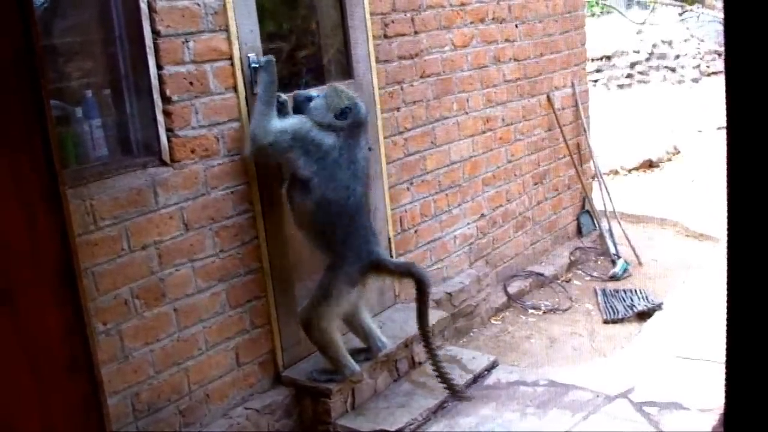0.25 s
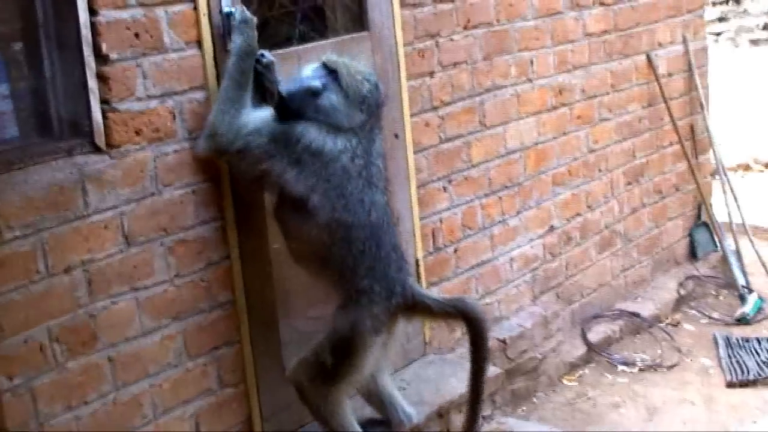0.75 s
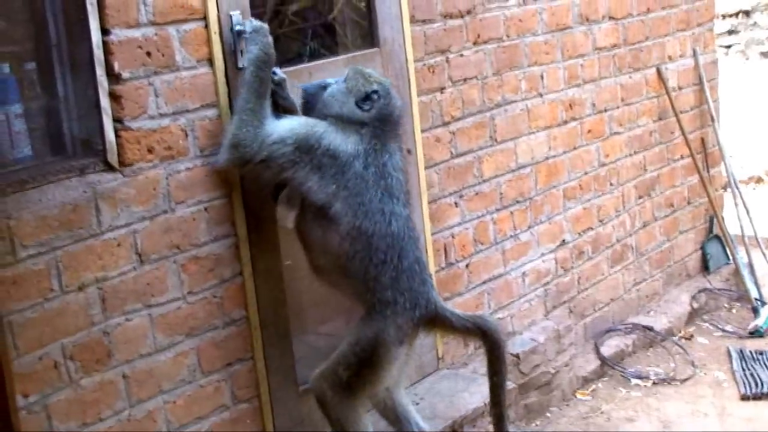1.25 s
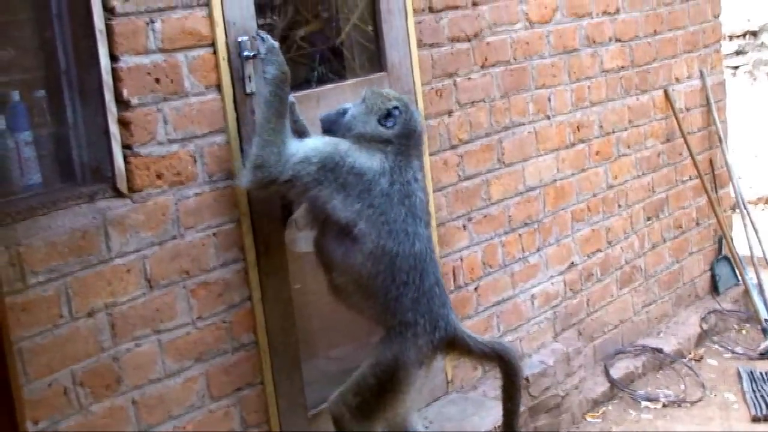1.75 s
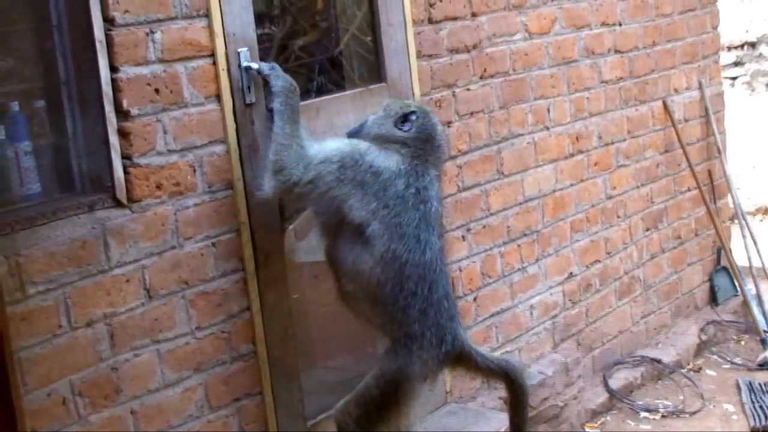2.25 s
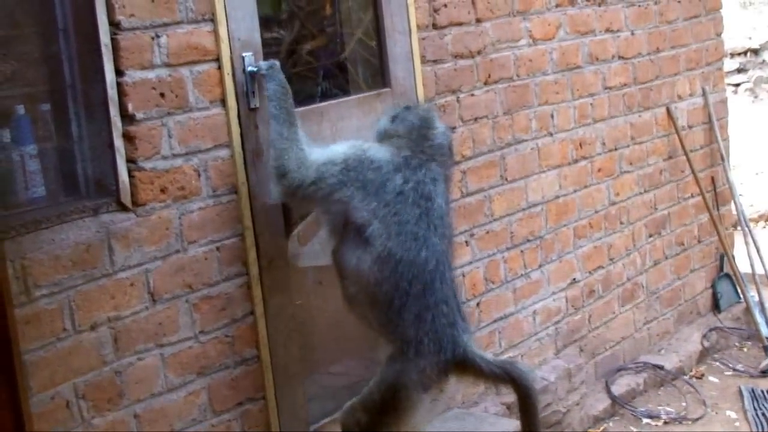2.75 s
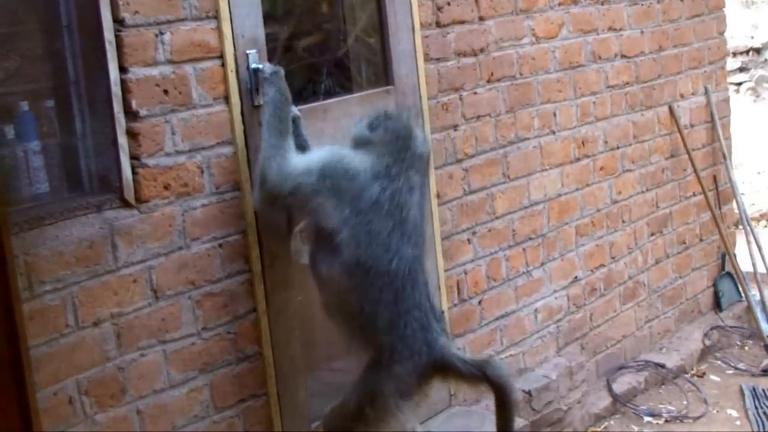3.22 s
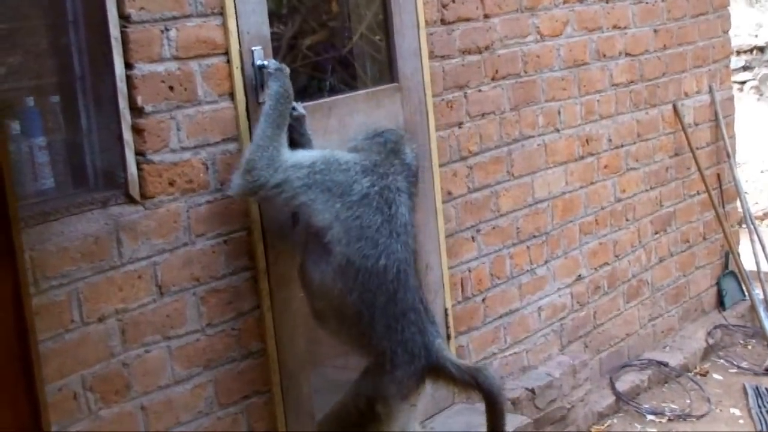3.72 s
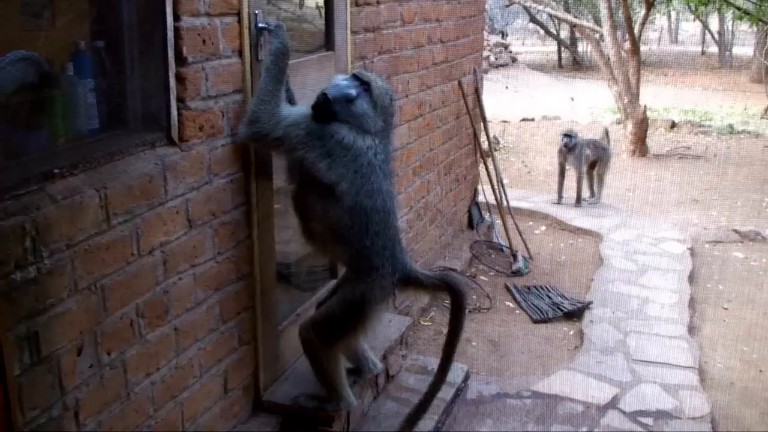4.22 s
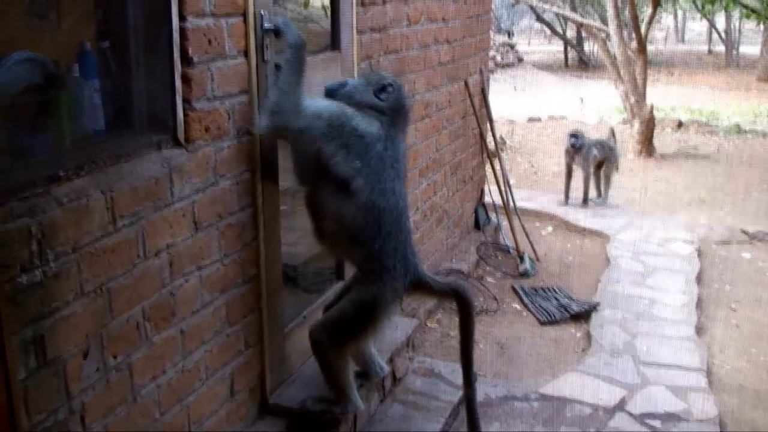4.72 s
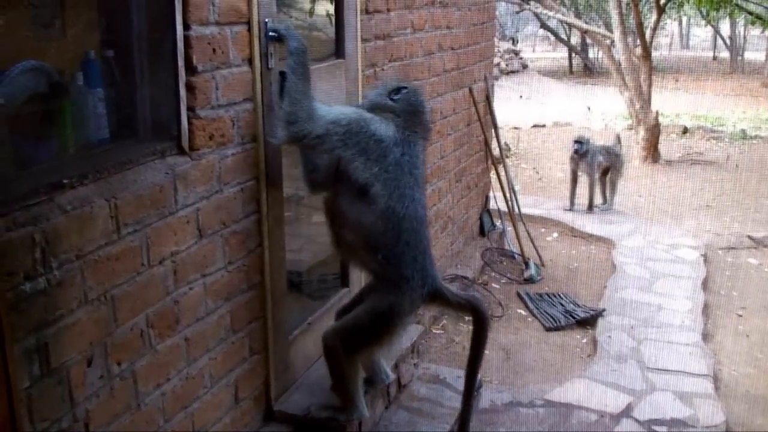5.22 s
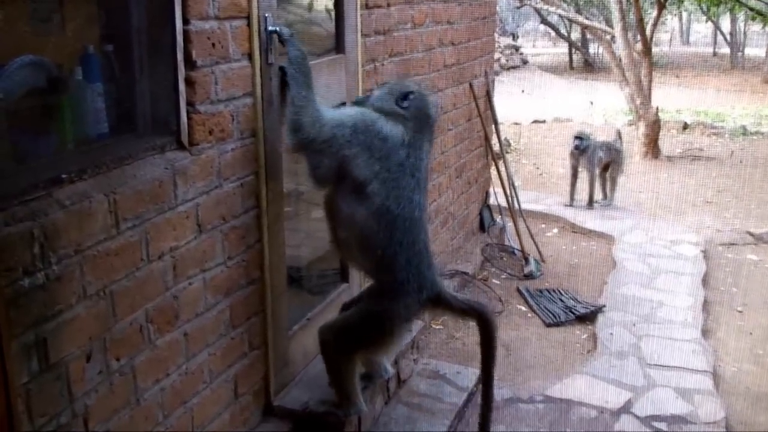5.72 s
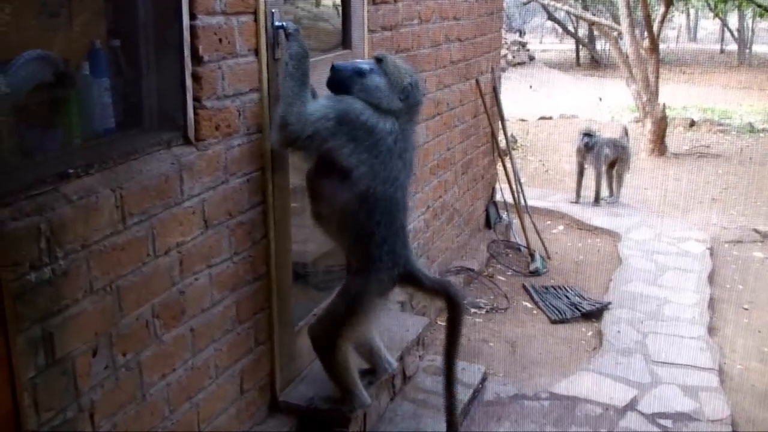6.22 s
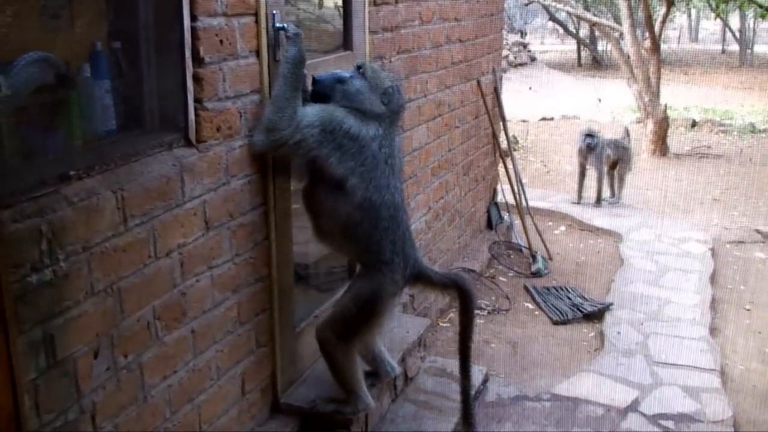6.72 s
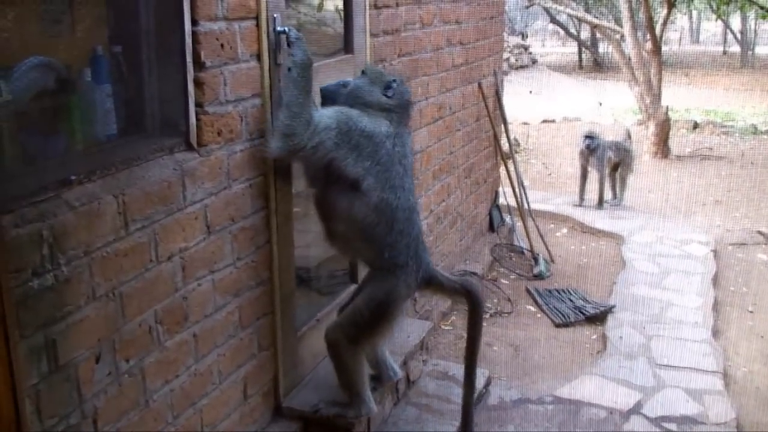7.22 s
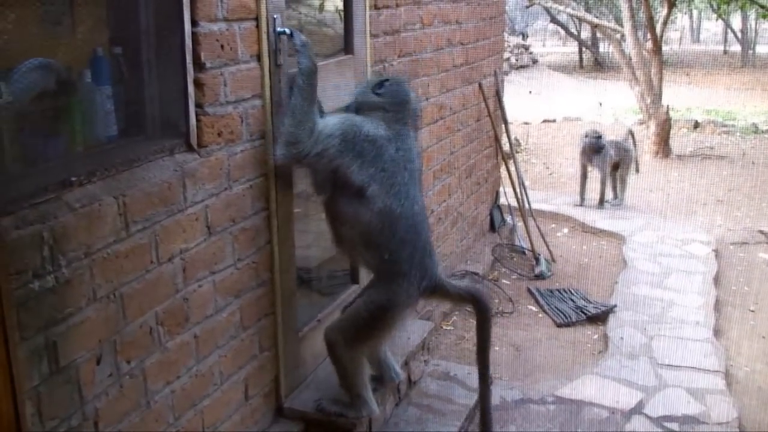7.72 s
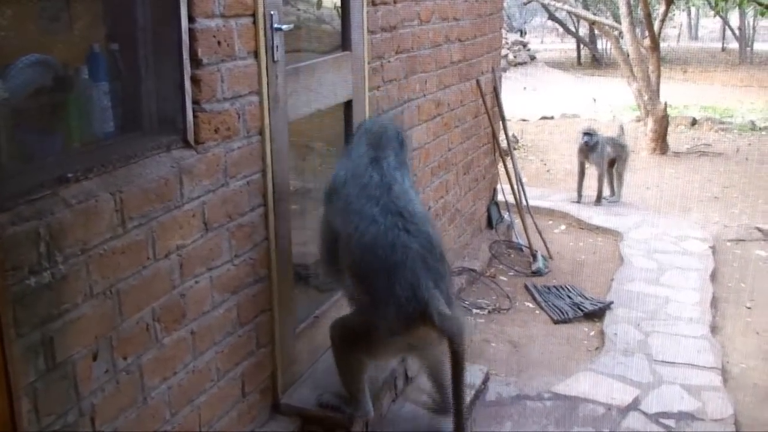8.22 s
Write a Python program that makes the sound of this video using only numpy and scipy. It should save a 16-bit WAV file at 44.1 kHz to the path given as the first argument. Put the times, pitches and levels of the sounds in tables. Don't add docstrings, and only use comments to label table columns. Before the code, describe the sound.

Close to a brick house, a metal handle and latch clack violently for about half a second, then fall quiet apart from faint squeaks and birds. A light jiggle leads into a second hard rattle. After a tiny cut to silence, the perspective changes: soft woody knocks, then a third fierce yank, lull and a final door knock. Short wall reflections, slight hiss.

```python
import sys
import numpy as np
from scipy import signal
from scipy.fft import rfft, irfft, next_fast_len
from scipy.io import wavfile
from scipy.ndimage import uniform_filter1d

SR = 44100
rng = np.random.default_rng(int(sys.argv[2]) if len(sys.argv) > 2 else 0)


def materialize(psi):
    bounded = np.clip(np.atleast_2d(psi).T, -1, 1)
    quanta = np.round(bounded * 32767).astype(np.int16)
    wavfile.write(sys.argv[1], SR, quanta)


def to_linear_factor(level_db):
    exponent = np.asarray(level_db, float) / 20
    return 10 ** exponent


N = 373086
T = np.arange(N) / SR
GAP_START_S, GAP_END_S = 4.174, 4.196
FIRST = T < GAP_START_S
BLOW = 8192

# (time [s], peak level [dB], low thud [dB], bright tick [dB])
FIRST_YANK = [(-0.008, -8.5, -8.5, -17), (0.0515, -12.5, -30, -17), (0.0965, -6, -14, -16),
              (0.1648, -6.5, -39, -18), (0.2396, -9, -17, -22), (0.274, -10.5, -19, -15),
              (0.2897, -11.5, -12, -14), (0.3576, -7.5, -23, -18.5), (0.3842, -12, -18, -29),
              (0.4127, -7.5, -18, -18), (0.4724, -10, -23, -19.5), (0.515, -16.5, -15, -14),
              (0.5543, -20, -13, -16), (0.5776, -29, -15, -26), (0.6569, -33, -7, -31),
              (1.2588, -25.5, -21, -9), (1.2643, -27.5, -17, -12), (1.3431, -20.5, -15.5, -11.5)]
JIGGLE = [(2.0695, -39.5, -4, -25), (2.1077, -36, -12, -4), (2.133, -31.5, -16, -33),
          (2.149, -25, -13, -13), (2.288, -28, -12.5, -11), (2.3793, -25, -14.5, -22),
          (2.438, -20, -13.5, -17), (2.47, -19.5, -13.5, -10), (2.528, -11.5, -19.5, -11.5),
          (2.574, -17, -14.5, -27), (2.599, -25, -4, -17), (2.6255, -19, -16, -17), (2.634, -11, -14, -16),
          (2.767, -34, -6, -30), (2.8066, -27.5, -25, -65)]
SECOND_YANK = [(2.83, -17.5, -16, -21), (2.871, -12, -15.5, -28), (2.9144, -7.5, -34, -13.5),
               (2.9418, -7, -16.5, -15), (3.0071, -6.5, -27, -16.5), (3.082, -10, -17, -18),
               (3.1016, -13, -16, -58), (3.1648, -9.5, -14, -18.5), (3.207, -20, -6.5, -17),
               (3.2327, -10, -17.5, -20.5), (3.2679, -7.5, -21, -15), (3.3141, -6.5, -22.5, -19),
               (3.3764, -7.5, -20, -20.5), (3.4184, -18.5, -19, -47), (3.4562, -11.5, -17, -26),
               (3.5355, -28.5, -3.5, -56), (3.5496, -20.5, -17, -51), (3.6971, -38, -6, -37),
               (3.715, -34, -6, -46), (3.845, -46, -12, -48)]
THIRD_YANK = [(5.679, -17, -14, -47), (5.698, -24, -24, 0), (5.7124, -10, -20, -3.5), (5.736, -13, -17, -9),
              (5.748, -6.5, -16, -20), (5.8133, -7, -32, -14.5), (5.8438, -14, -22, -11),
              (5.8708, -17.5, -10, -13), (5.89, -8.5, -25.5, -20), (5.956, -10.5, -19, 1.5),
              (5.9688, -8, -15.5, -12), (6.044, -10, -22, -8), (6.0495, -7, -18.5, -21),
              (6.0658, -10.5, -15.5, -38), (6.076, -10.5, -19, -20), (6.1441, -6.5, -37, -18),
              (6.17, -10.5, -15, -20), (6.2231, -13.5, -11, -22), (6.36, -24, -15, -13),
              (6.299, -15, -15.5, -19), (6.3876, -16.5, -27, -12.5), (6.4479, -27, -10, -22),
              (6.5194, -34, -14, -36), (6.5316, -32, -15, -38)]
KNOCKS = [(4.196, -34.5, -0.5, -27), (4.2166, -23.5, -12.5, -36), (1.358, -28.5, -12, -30),
          (1.378, -33.5, -10, -35), (1.398, -37, -11, -35), (4.5956, -30.5, -13.5, -19),
          (4.661, -28.5, -19.5, -18), (4.7793, -32, -13, -16), (4.8056, -22, -12, -23),
          (4.8455, -29, -9, -18), (5.1402, -45, -12, -16), (5.1548, -25.5, -15, -17),
          (5.201, -26, -14.5, -22), (5.2656, -33, -4.5, -15), (5.311, -28, -18, -21),
          (5.323, -21, -13, -12.5), (5.6172, -25.5, -10.5, -21), (5.6422, -31.5, -12.5, -30),
          (7.8024, -30, -12, -17), (7.8292, -18, -18, -8), (7.8604, -12.5, -16, -15),
          (7.8724, -14.5, -17, -8), (7.8802, -18.5, -15, -5)]
NEAR_BLOWS = FIRST_YANK + JIGGLE + SECOND_YANK


def level(x, db):
    return x * to_linear_factor(db) / np.sqrt(np.mean(x ** 2))


def curve(table, hz):
    points = np.array(table)
    return np.interp(np.log(hz + 1), np.log(points[:, 0]), points[:, 1])


def tint(x, table):
    size = next_fast_len(N)
    hz = np.arange(size // 2 + 1) * SR / size
    return irfft(rfft(x, size) * to_linear_factor(curve(table, hz)), size)[..., :N]


def walk(rate):
    k = int(SR / rate)
    steps = np.repeat(rng.standard_normal(N // k + 1), k)
    return 1.3 * uniform_filter1d(uniform_filter1d(steps, k), k)[:N]


def grit(shape, spread_db):
    return rng.standard_normal(shape) * to_linear_factor(spread_db * rng.exponential(size=shape))


def causal(db):
    cep = irfft(db * np.log(10) / 20)
    half = cep.shape[-1] // 2
    fold = np.r_[1, 2 * np.ones(half - 1)]
    return np.exp(rfft(cep[..., :half] * fold, 2 * half))


def rings(modes, hz, gains, detune=0.99):
    mode_hz, width_hz, db = np.transpose(modes)[:, :, None]
    resonance = 1 / (1 + 2j * (hz - mode_hz * detune) / width_hz)
    return np.sum(gains[..., None] * to_linear_factor(db) * resonance, axis=-2)


def puffs(events, length_s):
    return sum(to_linear_factor(db) * np.exp(-((T - s) / length_s) ** 2) for s, db in events)


def air(table, db):
    noise = tint(rng.standard_normal((2, N)), table) * to_linear_factor(walk(1.13))
    low = signal.sosfilt(signal.butter(2, 1100, fs=SR, output="sos"), noise)
    return level(noise + low * (to_linear_factor(2.4 * walk(4)) - 1), db)


def still_air():
    # (frequency [Hz], level [dB per Hz])
    near_air = [(35, -37), (60, -8.5), (330, -18), (553, -7), (593, -8.5), (1310, -14.5), (1860, -15.5),
                (4120, -13), (5500, -18), (6370, -27), (7910, -20.5), (9290, -30), (15000, -39),
                (15150, -90)]
    side_air = [(35, -24), (60, -15), (176, -6.5), (363, -11), (437, -6.5), (842, -3.5), (1010, -9),
                (2410, -15.5), (3700, -25.5), (5800, -15), (7760, -19), (15000, -34), (15150, -90)]
    return np.where(FIRST, air(near_air, -55.5), air(side_air, -55))


def hum():
    # (frequency [Hz], level [dB])
    hums = [(600, -68.5), (1800, -78)]
    return FIRST * sum(to_linear_factor(db + 2 * walk(2.6)) * np.sin(2 * np.pi * hz * T) for hz, db in hums)


def whine():
    # (multiple of the base tone [1], level [dB])
    partials = [(13, -78), (14, -75), (15, -78), (16, -77), (17, -77), (19, -80), (22, -82), (24, -84),
                (33, -86), (34, -85), (36, -86), (38, -86), (46, -96)]
    base_hz = 299.7
    return sum(to_linear_factor(db) * np.sin(2 * np.pi * k * base_hz * T + k * k) for k, db in partials)


def whistles():
    # (time [s], length [s], start [Hz], end [Hz], level [dB])
    peeps = [(.86, .03, 4200, 4100, -59), (.86, .04, 3100, 3100, -60), (1.04, .09, 3300, 2550, -62),
             (1.188, .055, 3720, 3500, -42), (1.25, .12, 3580, 3600, -60), (1.305, .06, 780, 830, -46),
             (1.54, .05, 1850, 2000, -59), (1.54, .05, 2300, 2600, -62), (2.275, .1, 1600, 1600, -50),
             (2.76, .04, 3800, 3300, -54), (4.02, .04, 3000, 3100, -60), (5.083, .015, 2900, 3000, -57),
             (6.59, .03, 3500, 2600, -52), (6.8, .2, 2800, 2800, -64), (6.65, .03, 2900, 2500, -60),
             (7.3, .25, 870, 850, -60), (7.19, .03, 1600, 1560, -60), (7.82, .03, 1700, 1700, -40)]
    # (delay [s], length [s], start [Hz], middle [Hz], end [Hz])
    bird_voices = [
        (0, .11, 3800, 2900, 2550),
        (.015, .125, 3700, 5400, 3700),
    ]
    # (time [s], level [dB])
    bird_calls = [
        (1.83, -58),
        (3.61, -59),
        (4.03, -63),
    ]
    tones = [(s, length, a, (a + b) / 2, b, db) for s, length, a, b, db in peeps]
    for s, db in bird_calls:
        tones += [(s + delay, *voice, db) for delay, *voice in bird_voices]
    out = np.zeros(N)
    rough = np.clip(.9 + .6 * walk(160), .4, 3)
    waver = walk(500)
    for s, length, *pitches, db in tones:
        u = np.arange(int(length * SR)) / (length * SR)
        span = slice(int(s * SR), int(s * SR) + len(u))
        glide_hz = np.polyval(np.polyfit([0, .5, 1], pitches, 2), u)
        phase = 2 * np.pi * np.cumsum(glide_hz * (1 + to_linear_factor(-db - 88) * waver[span])) / SR
        tone = np.sin(phase) + to_linear_factor(db + 26) * np.sin(2 * phase)
        out[span] += to_linear_factor(db + 3.5) * np.sin(np.pi * u) ** .5 * tone
    return out * rough


def scuffs():
    # (time [s], length [s], level [dB])
    brushes = [
        (8.158, .02, -44),
        (8.12, .02, -53),
        (8.42, .03, -57),
        (5.635, .02, -44),
    ]
    colour = [(800, -20), (3000, -5), (8000, 0), (15000, -10), (16000, -14), (16300, -45)]
    hiss = level(tint(grit(N, 2.0), colour), 0)
    return hiss * sum(puffs([(s, db)], length) for s, length, db in brushes)


def bump():
    after = np.clip(T - 4.068, 0, 1)
    crackle = tint(rng.standard_normal(N), [(100, 3), (1200, 4), (2000, -22), (5000, -42)])
    pulse = level(crackle, -7.5) - np.sin(2 * np.pi * 240 * after)
    return to_linear_factor(-26) * pulse * np.exp(-after / .004) * (after > 0)


def swing():
    # (start [s], length [s], level [dB])
    swings = [
        (0, 0.59, -39),
        (2.537, 0.16, -41.5),
        (2.9, 0.66, -36.5),
        (4.17, 0.13, -50),
        (4.6, 0.084, -56),
        (4.785, 0.11, -50),
        (5.15, .1, -56.5),
        (7.826, .1, -48.5),
        (5.307, 0.063, -49),
        (5.689, 0.81, -33),
    ]
    rise_s, sag_db_s, release_db_s = 0.038, 11, 116
    gain = 0
    for s, length, db in swings:
        fall_db = sag_db_s * (T - s) + release_db_s * np.clip(T - s - length, 0, 9)
        rise = np.clip((T - s) / rise_s + (s == 0), 0, 1)
        gain = gain + rise * to_linear_factor(db - np.maximum(fall_db, 0))
    return gain


def heave():
    colour = [(12, -54), (29, 0.0), (40, -0.5), (55, -9), (80, -16), (140, -59.0)]
    return level(tint(rng.standard_normal(N), colour), 0)


def pump():
    # (time [s], level [dB])
    surges = [(.12, -41), (.38, -36), (.63, -41), (1.05, -50), (2.6, -43), (2.96, -36), (3.31, -42),
              (3.53, -41.5), (3.8, -48), (4.27, -49), (4.45, -53), (4.65, -56), (4.9, -58), (5.2, -58),
              (5.4, -57), (6.62, -47), (6.85, -53.5), (5.77, -34), (6.1, -36), (6.4, -39)]
    breeze = to_linear_factor(-63 + 2 * walk(1.27))
    return swing() * to_linear_factor(-9.5) + breeze + puffs(surges, 0.06)


def shaken(body, spread_db):
    response = np.roll(irfft(body), BLOW // 2) * np.hanning(BLOW)
    return level(signal.fftconvolve(grit(N, spread_db), response, "same"), 0)


def ringing(table, thud_share, rise_s, t60_s, slope, db, rest_db):
    s, peak_db, thud_db, _ = np.transpose(table)
    power = np.zeros(N)
    power[(np.maximum(s, 0) * SR).astype(int)] = to_linear_factor(2 * (peak_db + thud_share * thud_db))
    power = signal.lfilter([1], [1, -to_linear_factor(-120 / t60_s / SR)], power)
    keep = np.exp(-1 / (rise_s * SR))
    power = signal.lfilter([1 - keep], [1, -keep], power)
    return np.sqrt(to_linear_factor(2 * db) * power ** slope + to_linear_factor(2 * rest_db))


def panel():
    # (frequency [Hz], width [Hz], level [dB])
    panel_modes = [(124, 22, 4), (185, 35, -3), (300, 50, -3), (405, 30, -2), (800, 110, -2)]
    hz = np.arange(BLOW // 2 + 1) * SR / BLOW
    body = .5 + rings(panel_modes, hz, np.ones(len(panel_modes)))
    body = body / (1 + (hz / 1000) ** 4) / (1 + (114 / (hz + 1)) ** 8)
    shudder = ringing(NEAR_BLOWS + THIRD_YANK + KNOCKS, thud_share=0.75, rise_s=0.0656, t60_s=.5,
                      slope=1.2, db=-16, rest_db=-66)
    return shaken(body, spread_db=2.5) * np.hypot(shudder, swing())


def ticks():
    # (time [s], peak level [dB])
    touches = [
        (0.0807, -24.5),
        (2.7447, -45),
        (2.9223, -26),
        (2.9472, -31),
        (3.1717, -34),
        (3.3333, -32),
        (5.7294, -18),
        (6.0425, -18.5),
        (6.0596, -21),
    ]
    colour = [(5000, -40), (8000, 1), (12000, -4), (15700, -9), (16200, -40)]
    hiss = level(tint(grit(N, 2.2), colour), -8.5)
    decay_s = 0.0056
    return hiss * sum(to_linear_factor(db) * np.exp(-np.clip(T - s, 0, 1) / decay_s) * (T > s) for s, db in touches)


def bounces(count, gap_s, contact_s):
    draw = rng.random((count, 2, 12))
    at = np.cumsum(gap_s * (.4 + 0.84 * draw[:, 0]), axis=1) - gap_s * (.4 + 1.2 * draw[:, 0, :1])
    place = np.clip(at * SR, 0, BLOW - 1).astype(int)
    touch = np.zeros((count, BLOW))
    np.put_along_axis(touch, place, .35 + .55 * draw[:, 1], axis=1)
    touch[:, 0] = 1
    return signal.lfilter([1], [1, -np.exp(-1 / (contact_s * SR))], touch)


def contacts(s, peak_db, rebounds):
    at, db = np.transpose(rebounds)
    late = at - s
    parent = np.argmin(np.where(late > 0, late, 9), axis=0)
    place = (late[parent, np.arange(len(at))] * SR).astype(int) % BLOW
    power = np.zeros((len(s), BLOW))
    power[:, 0] = 1
    power[parent, place] = to_linear_factor(2 * (db - 3 - peak_db[parent, 0]))
    power[:, 1:] = uniform_filter1d(power[:, 1:], size=40, axis=1)
    listed = np.isin(np.arange(len(s)), parent)[:, None]
    contact_s = .0038
    power = signal.lfilter([1], [1, -np.exp(-2 / (contact_s * SR))], power)
    return np.sqrt(np.abs(power)), listed


def blows(table, t60_s, modes, colour, lo_hz, tick_share, rebounds=None, rise_s=0.0012):
    s, peak_db, thud_db, tick_db = np.transpose(table)[:, :, None]
    t = np.arange(BLOW) / SR
    hz = np.arange(BLOW // 2 + 1) * SR / BLOW
    t60 = np.clip(t60_s * to_linear_factor(0.1 * (peak_db + 9) - 0.18 * (thud_db + 19.5)), .01, .3)
    touch = bounces(len(s), gap_s=.008, contact_s=.007) * to_linear_factor(-60 * t / t60)
    listed = False
    if rebounds:
        known, listed = contacts(s, peak_db, rebounds)
        touch = np.where(listed, known, touch)
    push = grit((len(s), BLOW), 1.5)
    push = touch * push / np.sqrt(uniform_filter1d(push ** 2, size=90, axis=1))
    push = push * (1 - np.exp(-t / rise_s))

    bright = 1 / (1 + (6800 / (hz + 1)) ** 8)
    tilt = (thud_db + 12.5) / (1 + (hz / 1300) ** 4) + (tick_db + 27.0) * bright
    chance = rng.standard_normal((len(s), 2, len(modes)))
    gains = (1 + .4 * chance[:, 0]) * to_linear_factor(.15 * np.minimum(peak_db + 8, 0))
    plain = causal(curve(colour, hz) + tilt)
    body = plain * (1 + rings(modes, hz, gains, 1 + 0.0066 * chance[:, 1, :, None]))
    treble_push = push * to_linear_factor(-60 * t / (tick_share * t60))
    hit = body * (rfft(push) * (1 - bright) + rfft(treble_push) * bright)

    clack = irfft(hit * (hz > lo_hz) * (hz < 7000))
    touch_energy = np.sum(touch ** 2, axis=1, keepdims=True)
    by_energy = to_linear_factor(-1.5) * np.sqrt(touch_energy / np.sum(clack ** 2, axis=1, keepdims=True))
    by_peak = 1 / np.abs(clack).max(axis=1, keepdims=True)
    lead = 256
    hit = np.roll(irfft(hit), lead, axis=1) * to_linear_factor(peak_db - 1.0) * np.where(listed, by_energy, by_peak)
    out = np.zeros(N + 2 * BLOW)
    for start, h in zip((s[:, 0] * SR).astype(int) - lead + BLOW, hit):
        out[start:start + BLOW] += h
    loose_body = (body + plain).mean(axis=0) * (1 + 0.32 * bright) / (1 + (1100 / (hz + 1)) ** 4)
    return out[BLOW:N + BLOW], shaken(loose_body, spread_db=2.5)


def frame_knocks():
    # (frequency [Hz], width [Hz], lift [dB])
    knock_modes = [(790, 200, 1), (1400, 400, -2), (2190, 450, -2), (3600, 500, 0), (8700, 400, -2)]
    # (frequency [Hz], level [dB per Hz])
    knock_colour = [(100, -21.5), (250, -4.5), (1000, -2.5), (2300, -3), (4000, -10), (7000, -15.5),
                    (11000, -25.5), (15600, -41), (16200, -65)]
    return blows(KNOCKS, 0.085, knock_modes, knock_colour, lo_hz=1500, tick_share=.8, rise_s=.003)[0]


def side_handle():
    # (frequency [Hz], width [Hz], lift [dB])
    side_modes = [(790, 100, 3), (1360, 60, 4), (2190, 90, 0), (2470, 50, 4), (3030, 180, 3), (3570, 70, 1),
                  (4230, 50, 13), (5650, 150, 2), (6550, 100, 4), (7290, 60, 4), (8370, 100, 4)]
    # (frequency [Hz], level [dB per Hz])
    side_colour = [(60, -17), (100, 1.5), (250, 1.5), (1000, -1.5), (2000, -2), (3300, 0.5), (4300, -4),
                   (4800, -5.5), (7000, -18), (10000, -30), (15600, -47.5), (16200, -75)]
    # (time [s], peak level [dB])
    third_rebounds = [(5.7043, -21), (5.7625, -9.5), (5.776, -15), (5.7821, -18), (5.7926, -20),
                      (5.8214, -10), (5.8378, -11), (5.8552, -14), (5.8638, -17), (5.8808, -15),
                      (5.8996, -13), (5.9061, -11), (5.9182, -14), (5.9321, -20), (5.9411, -22),
                      (5.9469, -15), (5.9946, -15.5), (6.002, -15), (6.0117, -16), (6.0252, -25),
                      (6.0369, -19), (6.0836, -11.5), (6.0925, -18), (6.1004, -15), (6.1105, -21),
                      (6.1167, -20), (6.1248, -18), (6.1304, -17), (6.1519, -10), (6.1599, -8.5),
                      (6.188, -18), (6.1969, -17), (6.2134, -18), (6.2284, -17), (6.2408, -17),
                      (6.2516, -17), (6.2676, -21), (6.2771, -23), (6.2824, -24), (6.3052, -14.5),
                      (6.3203, -16), (6.3261, -18.5), (6.3349, -24), (6.3471, -25), (6.4038, -26),
                      (6.4088, -35), (6.4229, -37), (6.4558, -32.5)]
    return blows(THIRD_YANK, 0.097, side_modes, side_colour, lo_hz=1500, tick_share=.5,
                 rebounds=third_rebounds)


def near_handle():
    # (frequency [Hz], width [Hz], lift [dB])
    near_modes = [(840, 90, 2), (1540, 60, 0), (2450, 50, 3), (2980, 110, 1), (3770, 120, 0), (4220, 75, 8),
                  (4430, 60, 6), (4910, 90, 10), (5130, 60, 5), (5660, 55, 11), (7420, 90, 6),
                  (8320, 60, 7), (9300, 80, 7), (10150, 80, 8)]
    # (frequency [Hz], level [dB per Hz])
    near_colour = [(60, -25), (100, -7), (250, -8), (1000, -8), (2000, -11.5), (3300, -9), (5000, -6.5),
                   (6000, -14.5), (7000, -22.5), (10000, -37.5), (15000, -46), (16200, -71)]
    # (time [s], peak level [dB])
    first_rebounds = [(0.0145, -21), (0.0239, -26), (0.0303, -23), (0.0562, -11), (0.0688, -11),
                      (0.0806, -14), (0.1059, -16), (0.1143, -14), (0.1243, -16.5), (0.133, -25),
                      (0.1402, -20), (0.1533, -21), (0.1752, -9), (0.1853, -9), (0.193, -8), (0.2014, -15),
                      (0.218, -17), (0.2517, -10), (0.2582, -9.5), (0.2816, -16), (0.2973, -15),
                      (0.307, -18), (0.3142, -16), (0.3228, -18), (0.3291, -19), (0.3377, -25),
                      (0.347, -24), (0.3664, -14), (0.3786, -11.5), (0.3919, -18), (0.4028, -19),
                      (0.4218, -12), (0.4297, -16), (0.438, -15), (0.4433, -20), (0.4871, -22),
                      (0.4985, -24), (0.506, -24), (0.5319, -26), (0.5466, -29), (0.5723, -24),
                      (0.5918, -35), (0.5989, -33), (0.615, -36)]
    jiggle_rebounds = [(2.4286, -32), (2.4753, -21), (2.4856, -29), (2.4916, -37), (2.501, -38),
                       (2.5144, -38), (2.536, -11), (2.555, -29), (2.5904, -27), (2.6165, -37),
                       (2.658, -27), (2.6668, -30), (2.683, -35), (2.6905, -33), (2.7003, -37)]
    second_rebounds = [(2.8368, -28), (2.8448, -25), (2.8533, -24), (2.8934, -30), (2.9071, -25),
                       (2.9242, -10), (2.9502, -8), (2.957, -10), (2.9684, -12), (2.976, -14), (2.988, -20),
                       (3.0, -21), (3.023, -11), (3.037, -16), (3.0563, -22), (3.0626, -21), (3.0678, -20),
                       (3.0747, -21), (3.1149, -17), (3.1312, -22), (3.1402, -23), (3.152, -24),
                       (3.194, -19), (3.2235, -26), (3.2509, -28), (3.2587, -33), (3.276, -9),
                       (3.2836, -11), (3.293, -12), (3.2983, -14), (3.3076, -15), (3.3294, -9),
                       (3.3383, -12), (3.3537, -22), (3.3668, -22), (3.391, -14), (3.427, -21),
                       (3.448, -23), (3.463, -15), (3.4821, -18), (3.4887, -23), (3.51, -30), (3.52, -31),
                       (3.5262, -30), (3.5706, -33), (3.587, -33)]
    return blows(NEAR_BLOWS, 0.097, near_modes, near_colour, lo_hz=2470, tick_share=0.51,
                 rebounds=first_rebounds + jiggle_rebounds + second_rebounds)


def handle():
    near, near_loose = near_handle()
    side, side_loose = side_handle()
    chatter = ringing(NEAR_BLOWS + THIRD_YANK, thud_share=0, rise_s=0.0029, t60_s=0.3058,
                      slope=1.92, db=-13, rest_db=-65)
    return near + side + np.where(FIRST, near_loose, side_loose) * chatter


def yard(x, t60_low, t60_high, wet_db):
    # (frequency [Hz], level [dB])
    width = [(60, -5), (110, -44), (200, -25), (380, -18), (700, -14.5), (1290, -7), (2380, -8.5),
             (4400, -6.5), (8120, 16.5), (15000, -18)]
    t = np.arange(int(SR * .6)) / SR
    noise = rng.standard_normal((2, len(t)))
    low = signal.sosfilt(signal.butter(1, 900, fs=SR, output="sos"), noise)
    tail = 3.17 * low * to_linear_factor(-60 * t / t60_low) + (noise - low) * to_linear_factor(-60 * t / t60_high)
    tail = tail * (t > .003)
    tail = signal.sosfilt(signal.butter(2, 9000, fs=SR, output="sos"), tail)
    wet = signal.fftconvolve(x[None], tail / np.sqrt(np.sum(tail[0] ** 2)), axes=1)[:, :N]
    side = tint(0.29 * wet[1] + 0.17 * np.roll(x, 30), width)
    return np.array([x + to_linear_factor(wet_db) * wet[0], side])


def scene():
    song = whistles()
    door = panel() + frame_knocks() + handle()
    sources = door + 0.92 * song + scuffs() + ticks() + hum()
    mid, wide = yard(sources, t60_low=0.42, t60_high=0.17, wet_db=-7.5)
    sooner = FIRST * 0.91 * uniform_filter1d(np.gradient(mid), size=3)
    wide = wide + np.where(FIRST, .07, -.03) * mid - sooner
    mid, wide = np.array([mid, wide]) + still_air()
    pumping = pump()
    mid = mid + song / 2 + whine() + bump() + heave() * pumping
    wide = wide + heave() * pumping * to_linear_factor(-16.0)
    return np.array([mid + wide, mid - wide])


def squelch(x, from_hz, under_db, quiet_db):
    hz, _, z = signal.stft(x, SR, nperseg=512)
    power = np.abs(z) ** 2
    band = uniform_filter1d(power, size=5, axis=1)
    total = power[:1].sum(axis=1, keepdims=True)
    patch = rng.standard_normal((len(hz) // 2 + 1, z.shape[2] // 6 + 1))
    patch = np.repeat(np.repeat(patch, 2, axis=0), 6, axis=1)[:len(hz), :z.shape[2]]
    bar = total * to_linear_factor(2 * under_db + 14 * patch) * (total > to_linear_factor(2 * quiet_db))
    ceiling_hz = 15100
    bar = bar + (hz[:, None] > ceiling_hz) * (total * to_linear_factor(2 * under_db + 8) + to_linear_factor(-170))
    return signal.istft(z * ((band > bar) | (hz[:, None] < from_hz)), SR)[1][:, :N]


def band_limit(x):
    return signal.sosfilt(signal.butter(12, 16640, fs=SR, output="sos"), x)


def record(dry):
    gate = np.clip(np.maximum(GAP_START_S - T, T - GAP_END_S) / 0.00044, 0, 1)
    mid_side = np.array([dry[0] + dry[1], dry[0] - dry[1]]) / 2
    mid, wide = squelch(mid_side * gate, from_hz=8500, under_db=-56, quiet_db=-36)
    low_pass = signal.butter(8, 16200, fs=SR, output="sos")
    mix = signal.sosfilt(low_pass, np.array([mid + wide, mid - wide]))
    return band_limit(mix)


dry = scene()
out = record(dry)
materialize(out)
```